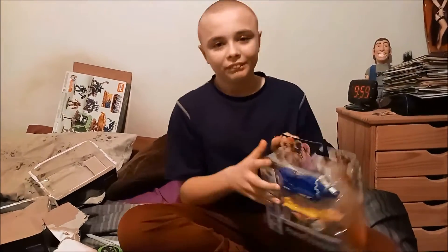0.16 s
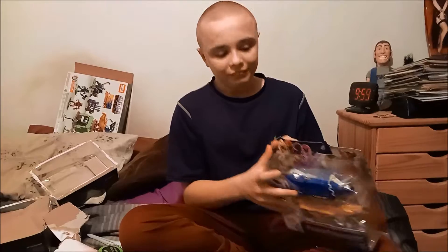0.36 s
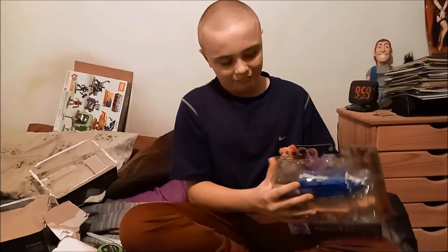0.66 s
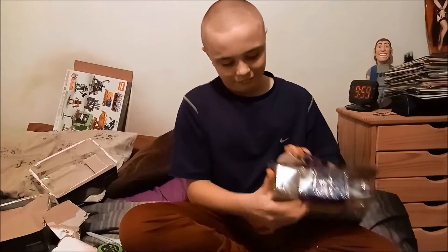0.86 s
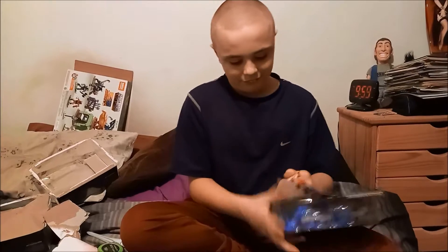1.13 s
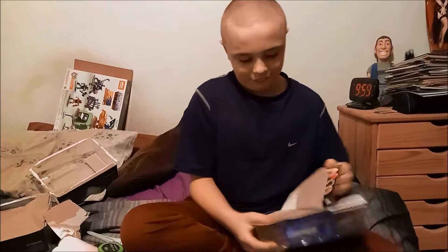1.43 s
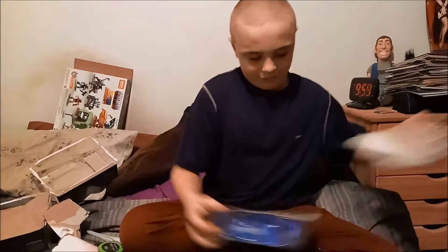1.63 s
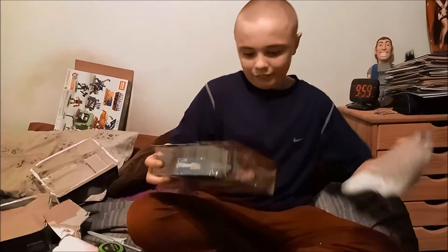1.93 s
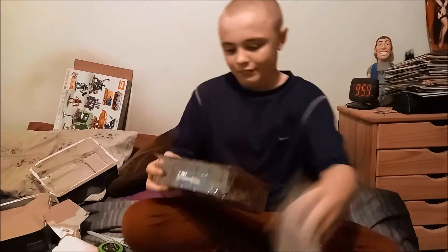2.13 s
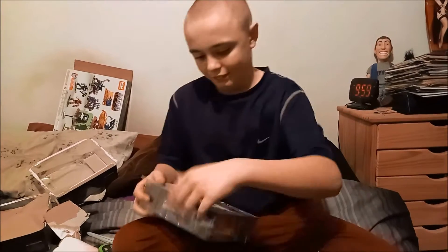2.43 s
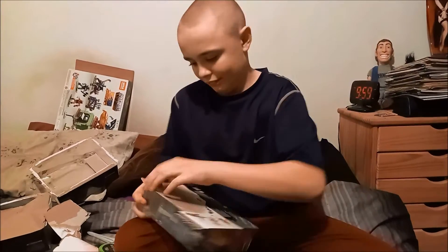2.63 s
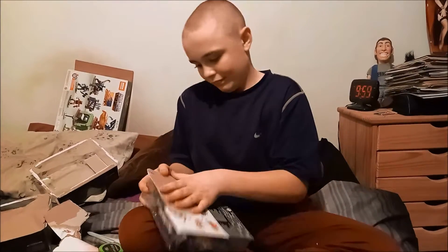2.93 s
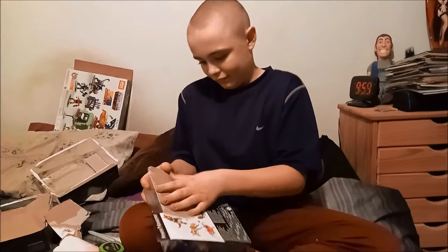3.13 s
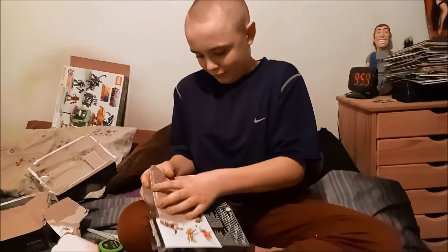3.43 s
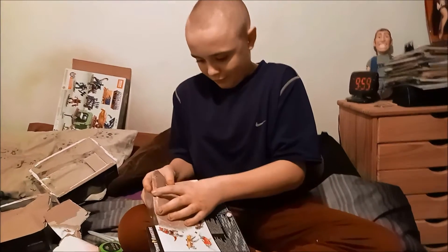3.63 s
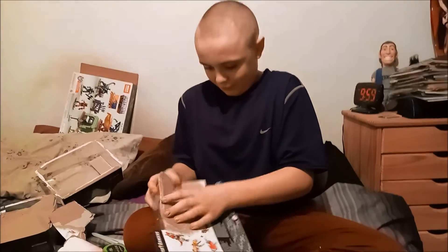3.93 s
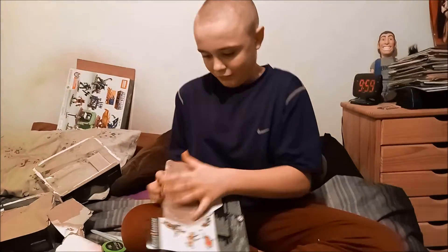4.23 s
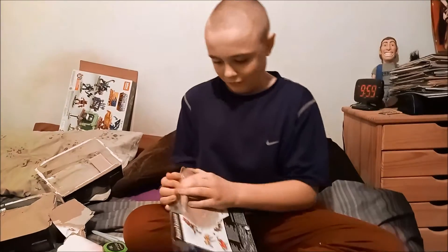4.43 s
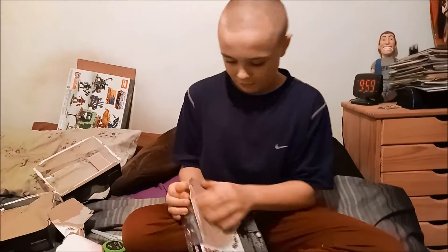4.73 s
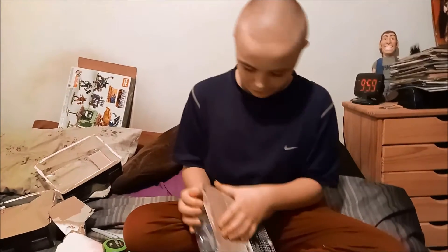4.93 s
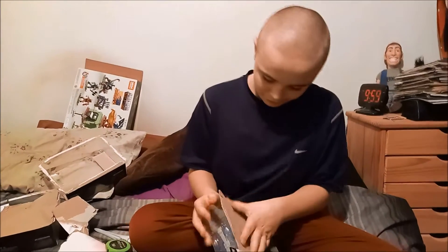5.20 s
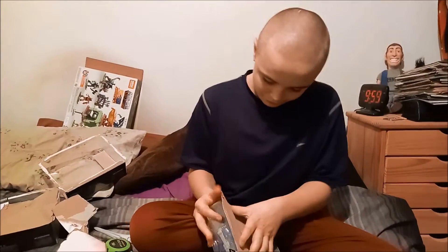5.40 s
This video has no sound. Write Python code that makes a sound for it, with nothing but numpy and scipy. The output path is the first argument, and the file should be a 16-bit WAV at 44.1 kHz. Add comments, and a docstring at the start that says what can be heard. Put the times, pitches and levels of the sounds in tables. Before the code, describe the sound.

Close plastic packaging crinkles, rips and clicks irregularly under busy hands, pausing briefly, then snapping more densely in a quiet small room.

```python
"""Hands tear the card off a stiff plastic blister pack and pry the shell open in a small bedroom.
A faint finger squeak (stick-slip tone) falls in pitch on the film among the first snapping creases.
From about 0.5 s pulls swell over the handling: fine grains crackle and ring the modes of the pack.
Creases keep snapping one by one, crowding after 3 s; each noise burst cracks and booms in the hollow pack.
Short room tails and still air lie under all of it; a one-channel microphone with a peaky treble hears it."""
import sys
import numpy as np
from scipy import signal
from scipy.fft import rfft, irfft
from scipy.io import wavfile
from scipy.ndimage import uniform_filter1d

SR = 44100
rng = np.random.default_rng(int(sys.argv[2]) if len(sys.argv) > 2 else 0)


def transcribe(signal):
    """Save signal, clipped to [-1, 1], as a 16-bit WAV file at the path in sys.argv[1]."""
    frames = np.atleast_2d(signal).T
    limited = np.clip(frames, -1, 1)
    pcm = np.round(limited * 32767).astype(np.int16)
    wavfile.write(sys.argv[1], SR, pcm)


N = 245195

# modes of the hollow pack: f/Hz, relative level/dB, t60/s
HOLLOW_MODES = [(129, 8, 0.048), (183, 2, 0.053), (306, 7.5, 0.032), (440, 9, 0.028), (552, 10.5, 0.029),
                (664, 8, 0.055), (896, 2, 0.0082)]
# modes of the plastic shell: f/Hz, relative level/dB, t60/s
SHELL_MODES = [(1088, 14, 0.014), (1507, 15, 0.0062), (1810, 12.5, 0.0045), (2210, 3.5, 0.015),
               (2760, -6.5, 0.014)]
# pack changing shape as the card comes off: t/s, pitch the flexing favours f/Hz, gain above 9 kHz/dB
OPENING_SHAPE = [(0, 520, 4), (1.25, 480, 5), (1.45, 384, 1.5), (2.35, 440, 1.5), (2.6, 604, 2),
                 (5.56, 487, -2.5)]


def gain_of(db):
    """Amplitude ratio of a level in dB."""
    return 10 ** (np.asarray(db) / 20)


def evened(x):
    """Scales x to rms 1."""
    return x / np.sqrt(np.mean(x ** 2) + 1e-20)


def loudest(x, size):
    """Scales x so that its loudest stretch of size samples has rms 1."""
    return x / np.sqrt(uniform_filter1d(x ** 2, size).max())


def smoothed_noise(count, size):
    """Slowly wandering noise of rms 1: white noise under a moving average."""
    return evened(uniform_filter1d(rng.standard_normal(count), size))


def highpass(hz):
    """Second-order high-pass sections."""
    return signal.butter(2, hz, "high", fs=SR, output="sos")


def read(points, hz):
    """Value of a curve at hz, interpolated over log frequency."""
    f, value = np.transpose(points)
    return np.interp(np.log(hz + 1), np.log(f + 1), value)


def add(mix, start_s, sound):
    """Adds sound to mix in place, cut off at its end."""
    part = mix[round(start_s * SR):][:len(sound)]
    part += sound[:len(part)]


def colour(x, points, size=2048):
    """Causal filter with the given gain/dB: the phase follows from the log gain."""
    hz = abs(np.fft.fftfreq(size, 1 / SR))
    log_gain = read(points, hz) * np.log(10) / 20
    taps = np.fft.ifft(np.exp(np.conj(signal.hilbert(log_gain)))).real
    return signal.oaconvolve(x, taps[:size // 2])[:len(x)]


def rings(modes, shift=1, size=3000):
    """One dying sine a mode, as rows; shift scales the pitches."""
    hz, db, t60_s = np.transpose(modes)[:, :, None]
    t = np.arange(size) / SR
    return gain_of(db - 60 * t / t60_s) * np.sin(2 * np.pi * hz * shift * t)


def detuned_rings(modes):
    """Modes as rings: the grip shifts each a little from crease to crease."""
    detune = .05  # standard deviation, share of the pitch
    return rings(modes, 1 + detune * rng.standard_normal((len(modes), 1)))


def grains(per_s, spread_db):
    """Tiny slips at random moments; most are small, a few large."""
    size_db = spread_db * np.minimum(rng.exponential(1, N), 5)
    size = gain_of(size_db) * rng.choice([-1., 1.], N)
    return size * (rng.random(N) < per_s / SR)


def still_air():
    """Still room: steady noise, strongest in the bass."""
    # noise spectrum: f/Hz, relative level per Hz/dB
    air_spectrum = [(30, -43), (90, 16), (300, -46), (8000, -81)]
    return gain_of(-57.5) * evened(colour(rng.standard_normal(N), air_spectrum))


def room(x):
    """Three overlapping tails of sparse taps, faded in and out in turn; each band dies at its own speed."""
    # reverberation time: f/Hz, t60/s
    decay_times = [(200, 0.22), (1000, 0.14), (3000, 0.27), (8000, 0.25), (15000, 0.22)]
    # share the walls throw back: f/Hz, relative level/dB
    wall_gain = [(200, 5), (800, 4), (2500, 3.5)]
    room_db, slot = -3.5, 16  # one tap a slot of 16 samples
    t, wet = np.arange(N) / SR, np.zeros(N)
    for k in range(3):
        taps = np.zeros(SR // 2)
        at = np.arange(150, SR // 2 - slot, slot)
        taps[at + rng.integers(0, slot, len(at))] = rng.choice([-1., 1.], len(at))
        hz, lag_s, bands = signal.stft(taps, SR, nperseg=128)
        fall_db = 60 * lag_s / read(decay_times, hz)[:, None]
        bands = bands * gain_of(read(wall_gain, hz)[:, None] - fall_db)
        tail = signal.istft(bands, SR, nperseg=128)[1]
        # the room sound varies as the tails take turns
        share = np.sqrt(2 / 3) * np.cos(np.pi * (t / 0.35 + k / 3))
        wet += signal.oaconvolve(x * share, tail / np.linalg.norm(tail))[:N]
    return gain_of(room_db) * wet


def squeak(length_s, first_hz, last_hz, db):
    """Regular stick and slip of a slowing finger: a slightly unsteady tone with its octave."""
    sag_power, fade_db = 1.25, -8  # the pitch holds, then sags; the level fades along
    u = np.arange(0, length_s, 1 / SR) / length_s
    hz = first_hz + (last_hz - first_hz) * np.sin(np.pi / 2 * u ** sag_power) ** 2
    waver = smoothed_noise(len(u), 150)
    phase = 2 * np.pi * np.cumsum(hz * (1 + 0.005 * waver)) / SR
    octave = gain_of(-3 - 25 * u ** 2) * np.sin(2 * phase)  # dies first
    level_db = db + fade_db * u ** 2 + 3 * waver
    return gain_of(level_db) * (np.sin(phase) + octave) * signal.windows.tukey(len(u), .2)


def effort(t):
    """Crackle and flexing levels in dB: the pulls swell over the rising and falling handling."""
    # fingers busy on the pack: t/s, crackle of fibres and film/dB, flexing of the pack/dB
    busy_levels = [(0, -56, -57), (.3, -70, -64.5), (.46, -51, -54), (.8, -69, -64), (1.07, -31.5, -52),
                   (1.62, -49, -46), (1.8, -50, -59), (2.04, -73, -94), (2.138, -46, -60), (2.4, -82, -65),
                   (2.521, -49.5, -54.5), (2.81, -59.5, -58), (2.92, -43.5, -43), (3.34, -42.5, -54),
                   (3.64, -43, -45.5), (3.78, -54.5, -63), (4.2, -39.5, -49.5), (4.62, -47, -47),
                   (5.1, -40, -43.5), (5.56, -54, -44)]
    # pulls that tear the card or drag the film:
    # start t/s, length/s, crackle/dB, flexing/dB, level change over the pull/dB
    pull_events = [(0.55, 0.053, -28, -43.5, 2.5), (0.655, 0.095, -21.5, -61, -1),
                   (0.834, 0.01, -38, -44.5, 4.5), (0.951, 0.025, -30, -67, -8),
                   (1.109, 0.27, -20.5, -44, -13.5), (1.287, 0.08, -23.5, -45, 4.5),
                   (1.349, 0.069, -23, -28, 0.5), (1.444, 0.1, -23, -28.5, 3),
                   (2.728, 0.015, -49.5, -57, 7), (3.838, 0.13, -33, -46, 2.5),
                   (4.044, 0.045, -30.5, -36, 1.5), (4.517, 0.068, -39, -39.5, 6),
                   (4.694, 0.042, -35, -38.5, 4.5), (5.001, 0.019, -39, -48.5, 9),
                   (5.243, 0.028, -40, -32.5, -9), (5.462, 0.014, -53, -36, 2)]
    rise_db_per_s, fall_db_per_s = 490.5, 495  # how fast a pull sets in and lets go
    s, *levels = np.transpose(busy_levels)
    power = gain_of([np.interp(t, s, db) for db in levels]) ** 2
    for start_s, length_s, crackle_db, flex_db, change_db in pull_events:
        u = t - start_s
        shape_db = rise_db_per_s * np.minimum(u, 0) - fall_db_per_s * np.maximum(u - length_s, 0)
        shape_db += change_db * np.clip(u / length_s, 0, 1)
        power += gain_of([[crackle_db], [flex_db]]) ** 2 * gain_of(np.maximum(shape_db, -99)) ** 2
    return 10 * np.log10(power)


def fibre_crackle(crackle_db, clumps):
    """Dense fine slips of the fibres and sparser small creases hiss and tick in a drifting treble."""
    # gain over frequency: f/Hz, relative level/dB
    crackle_gain = [(400, 1.5), (1200, -1), (2500, -3.5), (5000, -5), (9000, 3.5), (16000, 7.5)]
    drift_db = 3.5
    tick_share = np.interp(crackle_db, [-50, -32], [.8, .4])  # ticks stand out when gentle
    slips = evened(grains(4500, 2.6)) + tick_share * evened(grains(200, 4.))
    crackle = evened(colour(slips, crackle_gain) * gain_of(1.4 * clumps))
    bands = signal.stft(crackle, nperseg=256)[2]
    patches = uniform_filter1d(rng.standard_normal(bands.shape), 14, 0)
    patches = evened(uniform_filter1d(patches, 16, 1))
    drifting = signal.istft(bands * gain_of(drift_db * patches), nperseg=256)[1][:N]
    return gain_of(crackle_db) * evened(drifting)


def pack_flexing(flex_db, clumps):
    """Sparse, clumped slips set the hollow and the shell ringing, most near the favoured pitch."""
    bodies = np.vstack([rings(HOLLOW_MODES), gain_of(1.5) * rings(SHELL_MODES)])
    s, favoured_hz, _ = np.transpose(OPENING_SHAPE)
    mode_hz = np.concatenate([np.transpose(HOLLOW_MODES)[0], np.transpose(SHELL_MODES)[0]])
    track_hz = np.interp(np.arange(N) / SR, s, favoured_hz)
    flex = np.zeros(N)
    for hz, body in zip(mode_hz, bodies):
        octaves = np.minimum(abs(np.log2(hz / track_hz)), 1)
        slips = grains(240, 3.2) * gain_of(2.5 * clumps) * gain_of(-11 * octaves)
        flex += signal.oaconvolve(slips, body)[:N]
    return gain_of(flex_db) * evened(flex)


def handling():
    """Crackle and flexing under the fingers, each clumped at random and following the effort."""
    crackle_db, flex_db = effort(np.arange(N) / SR)
    clumps = [evened(uniform_filter1d(smoothed_noise(N, 400), 400)) for _ in range(2)]
    return fibre_crackle(crackle_db, clumps[0]) + pack_flexing(flex_db, clumps[1])


def crease_slip(slip_ms):
    """One sharp break and a ragged slip after it, as noise that sticks and lets go."""
    break_height = 0.44  # over the start of the slip
    t = np.arange(2000) / SR
    fade = np.exp(-t * 1000 / max(slip_ms, .3)) + break_height * np.exp(-t / 0.00093)
    catches = gain_of(6 * smoothed_noise(2000, 40))
    slip = rng.standard_normal(2000) * fade * catches ** np.minimum(t / .003, 1)
    lines = rfft(slip * np.minimum(t / .0004, 1), 4096)
    return irfft(lines / uniform_filter1d(abs(lines), 40))[:2000]  # a break excites all pitches alike


def snap(crack_db, hollow_db, shell_db, hollow_hz, slip_ms):
    """A giving crease cracks in the treble and strikes shell and hollow, convolved with their modes."""
    slip = crease_slip(slip_ms)
    crack = signal.sosfilt(highpass(2600), slip)
    tints_db = 3 * rng.standard_normal(6)  # each crease has its own treble colour
    crack = colour(crack, list(zip(np.geomspace(2500, 16000, 6), tints_db)), size=256)
    spot_db = 3.2 * rng.standard_normal((len(SHELL_MODES), 1))  # another spot favours other modes
    shell = (gain_of(spot_db) * detuned_rings(SHELL_MODES)).sum(0)
    # the grip favours the modes near one pitch
    octaves = np.log2(np.transpose(HOLLOW_MODES)[0] / hollow_hz)[:, None]
    hollow = (gain_of(-15 * abs(octaves)) * detuned_rings(HOLLOW_MODES)).sum(0)
    # soft card rounds the blow
    push = np.convolve(slip, np.hanning(int(.7 * SR / hollow_hz)), "full")[:2000]
    out = gain_of(hollow_db) * loudest(signal.fftconvolve(push, hollow), size=400)
    out += gain_of(shell_db) * loudest(signal.fftconvolve(slip, shell), size=400)
    out[:2000] += gain_of(crack_db) * loudest(crack, size=60)
    return out


def opening_treble(pack):
    """The band above 9 kHz rises or falls as the pack changes shape."""
    s, _, top_db = np.transpose(OPENING_SHAPE)
    top = signal.sosfiltfilt(highpass(9000), pack)
    return pack + (gain_of(np.interp(np.arange(N) / SR, s, top_db)) - 1) * top


def scene():
    """Handling, snaps and squeaks in the room, alike on both channels."""
    # creases that give way: t/s, crack/dB, hollow pack/dB, shell/dB,
    # pitch the hollow favours f/Hz, decay time of the slip/ms (at least 0.3 is used)
    crease_events = [(0.0379, -36, -34, -37, 342, 16), (0.0511, -27, -22, -30, 550, 1.3),
                     (0.1369, -46.5, -35, -46, 375, 5), (0.183, -41, -36.5, -48.5, 446, 2.1),
                     (0.2147, -40, -35, -46.5, 344, 5.1), (0.3943, -46.5, -41, -53.5, 500, 4.3),
                     (0.417, -64, -36.5, -76, 378, 2.7), (0.4609, -50, -33.5, -57, 347, 3.8),
                     (0.4954, -19, -24.5, -25.5, 328, 1.2), (0.5568, -20.5, -66, -27, 517, 2.2),
                     (0.634, -24.5, -25.5, -31.5, 514, 4), (0.798, -33.5, -29.5, -37, 436, 2.9),
                     (0.8452, -33, -34, -41, 410, 2.8), (0.8875, -23, -36.5, -37.5, 400, 4.6),
                     (0.9342, -32, -35, -38, 554, 3.2), (0.9559, -34, -24.5, -35, 480, 4.5),
                     (1.028, -36, -59, -58, 390, 2.3), (1.075, -39, -35.5, -39.5, 500, 3.7),
                     (1.0929, -20, -33, -35, 547, 11), (1.542, -52, -16, -29, 384, 6.1),
                     (1.571, -21, -54, -28, 342, 4.3), (1.592, -45, -16.5, -33, 500, 7.5),
                     (1.7092, -37, -24.5, -33, 413, 3.6), (1.857, -47.5, -61, -85, 442, 3.1),
                     (1.9, -43.5, -56, -71, 310, 1.7), (1.938, -32.5, -76, -38.5, 474, 1.8),
                     (2.136, -32, -42, -31, 759, 3.1), (2.2326, -23, -30, -23, 780, 3.3),
                     (2.266, -34, -36, -39, 743, 3), (2.288, -37, -40, -34, 764, 1),
                     (2.3134, -56, -67, -28, 773, 0.45), (2.345, -41, -57, -62, 700, 0.95),
                     (2.4472, -51.5, -45, -48, 145, 4.5), (2.47, -54, -34.5, -46, 190, 4.3),
                     (2.494, -64, -30.5, -68, 253, 1), (2.5104, -50, -41, -43, 507, 1.9),
                     (2.5327, -63, -62, -51, 593, 2.3), (2.561, -36.5, -69, -41.5, 619, 1.8),
                     (2.579, -42, -68, -60, 600, 1), (2.605, -34, -70, -43, 571, 2.2),
                     (2.641, -43, -49, -48.5, 550, 4.8), (2.823, -59, -32, -49, 198, 6),
                     (2.884, -51, -32, -61, 186, 3.6), (2.9, -39.5, -53, -36, 400, 1.6),
                     (2.917, -32, -49, -52, 500, 5), (2.9415, -47, -37, -47, 436, 2.6),
                     (2.9625, -40.5, -20, -31.5, 570, 1.6), (3.0734, -29.5, -39, -31.5, 541, 5.7),
                     (3.0911, -26.5, -24, -25.5, 680, 2.2), (3.095, -26.5, -18, -23.5, 680, 3.6),
                     (3.22, -32, -56, -36, 762, 2.2), (3.24, -29.5, -22, -28, 536, 1.9),
                     (3.2895, -19.5, -61, -16.5, 439, 0.66), (3.347, -33.5, -32, -35, 600, 3),
                     (3.368, -37, -22.5, -32.5, 670, 2.7), (3.434, -39, -36, -44, 400, 6.4),
                     (3.495, -58, -48, -51, 500, 2), (3.508, -55, -28, -57, 223, 9),
                     (3.5177, -22, -26.5, -29, 374, 1.7), (3.547, -41, -27, -31, 547, 8.1),
                     (3.68, -54, -25, -39, 236, 3.3), (3.69, -22, -38, -30.5, 680, 1.8),
                     (3.8203, -19, -63, -27.5, 746, 5.4), (3.901, -20, -38, -32, 610, 0.44),
                     (3.922, -14.5, -39.5, -30, 517, 2.4), (4.0116, -14.5, -15.5, -21.5, 535, 2.2),
                     (4.159, -60, -40, -48, 700, 5.7), (4.1711, -24, -23, -23, 676, 1.4),
                     (4.2159, -25.5, -25.5, -27, 708, 11.4), (4.223, -22, -37, -18, 643, 1.1),
                     (4.3196, -38, -39, -45, 549, 6.5), (4.3414, -43, -23, -32, 600, 1.1),
                     (4.344, -16, -22.5, -32, 620, 3.3), (4.3501, -29, -53, -39, 614, 1.6),
                     (4.3808, -30, -22.5, -32, 590, 5.2), (4.417, -21.5, -49, -20.5, 695, 1.04),
                     (4.532, -41, -22, -36.5, 186, 8.2), (4.578, -26, -26, -32, 448, 1),
                     (4.643, -38, -36, -39.5, 298, 6.9), (4.7, -37, -21.5, -33.5, 262, 2.8),
                     (4.7849, -16.5, -59, -18, 638, 2.5), (4.845, -39, -23, -60, 320, 1.9),
                     (4.8688, -57, -26.5, -40, 453, 3.9), (4.9591, -35, -31.5, -32.5, 740, 6),
                     (5.009, -35, -33.5, -40, 308, 9.3), (5.053, -33, -25.5, -29, 660, 4.5),
                     (5.122, -46, -30.5, -49, 392, 2.7), (5.145, -37, -18, -42.5, 290, 0.88),
                     (5.168, -39, -47, -40, 500, 4), (5.2017, -22.5, -14.5, -21, 695, 9.1),
                     (5.2733, -32, -39, -40, 590, 2.3), (5.294, -26, -50, -35, 690, 1.7),
                     (5.33, -58, -33.5, -41, 184, 1.4), (5.4298, -22, -16.5, -23, 546, 3.9),
                     (5.5, -57, -28, -64, 304, 2.1), (5.5225, -43.5, -26.5, -55, 560, 2),
                     (5.5504, -37, -27.5, -53, 589, 6.6)]
    # finger slipping on the film: start t/s, length/s, first f/Hz, last f/Hz, starting level/dB
    squeak_events = [(0, .035, 3800, 3200, -60), (.235, .195, 3500, 2400, -68)]
    pack = handling()
    for start_s, *row in crease_events:
        add(pack, start_s, snap(*row))
    pack = opening_treble(pack)
    for start_s, *row in squeak_events:
        add(pack, start_s, squeak(*row))
    heard = pack + room(pack) + still_air()
    return np.array([heard, heard])


def record(dry):
    """Microphone colour, then the band limit."""
    # microphone response: f/Hz, gain/dB
    mic_gain = [(45, -34), (70, -24.5), (105, -13), (200, -8), (4300, 4), (5500, 3.5), (6800, 7.5),
                (7600, -2), (8500, -13), (10500, -9), (12000, -15), (13500, -23.5), (14700, -13),
                (15500, -11.5)]
    edge_hz = 15900
    coloured = np.array([colour(channel, mic_gain) for channel in dry])
    band_limit = signal.firwin(511, edge_hz, window=("kaiser", 9), fs=SR)
    return signal.oaconvolve(coloured, band_limit[None], "same")


dry = scene()
out = record(dry)
transcribe(out)
```